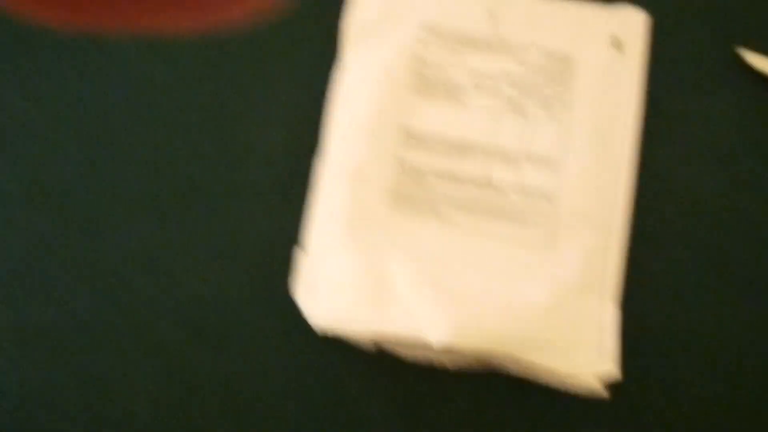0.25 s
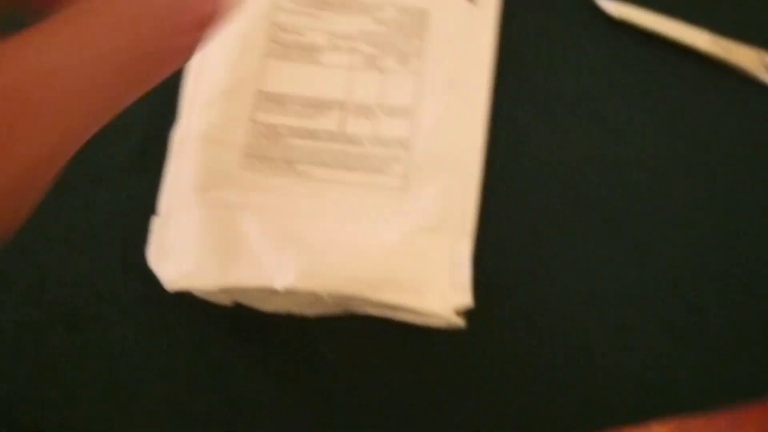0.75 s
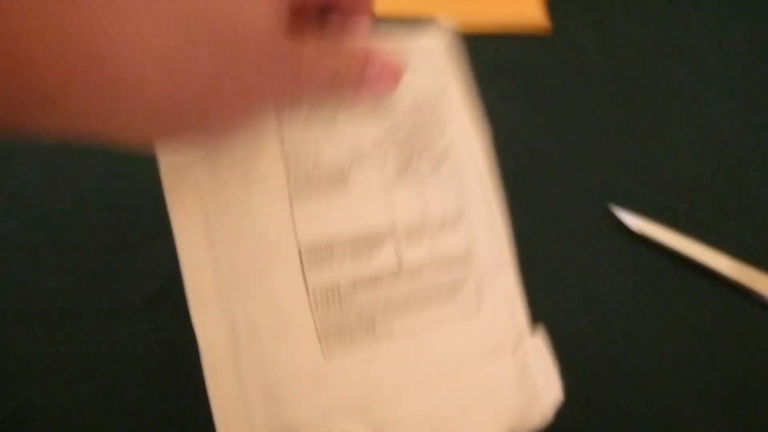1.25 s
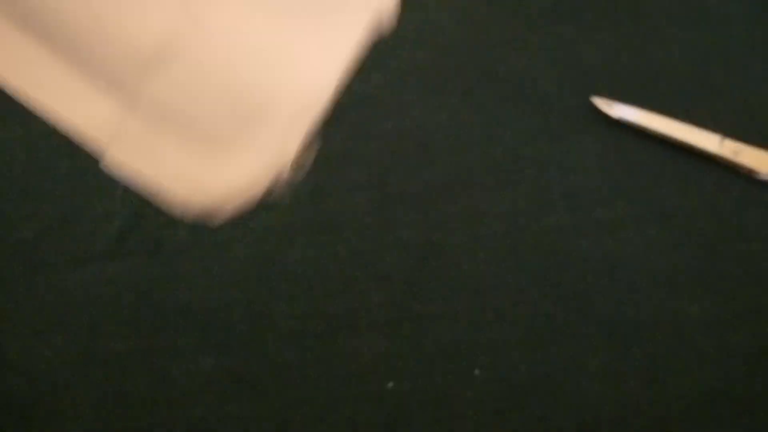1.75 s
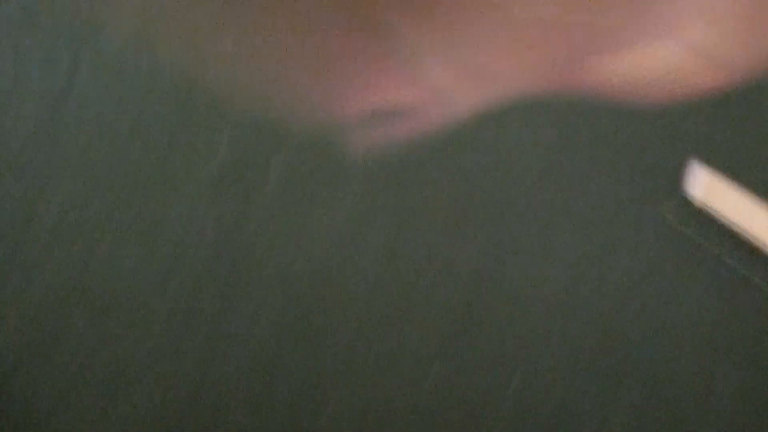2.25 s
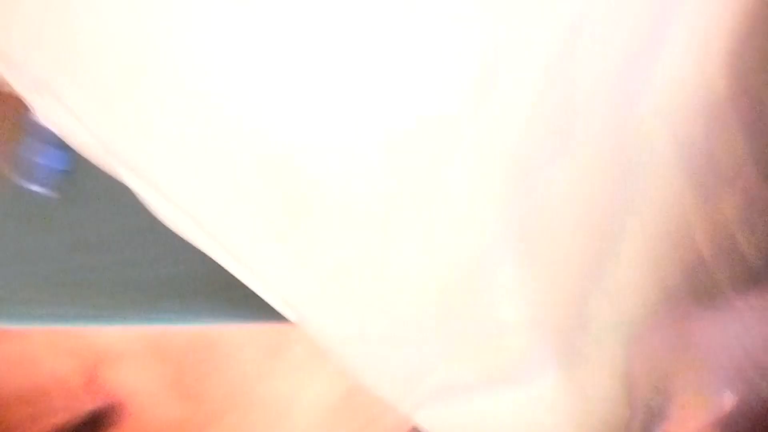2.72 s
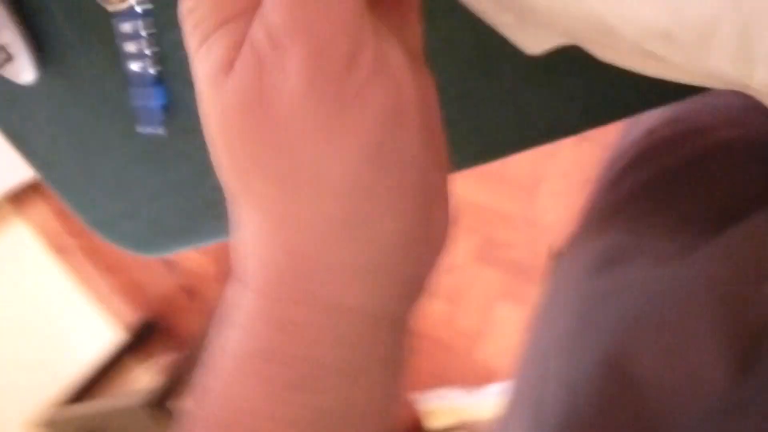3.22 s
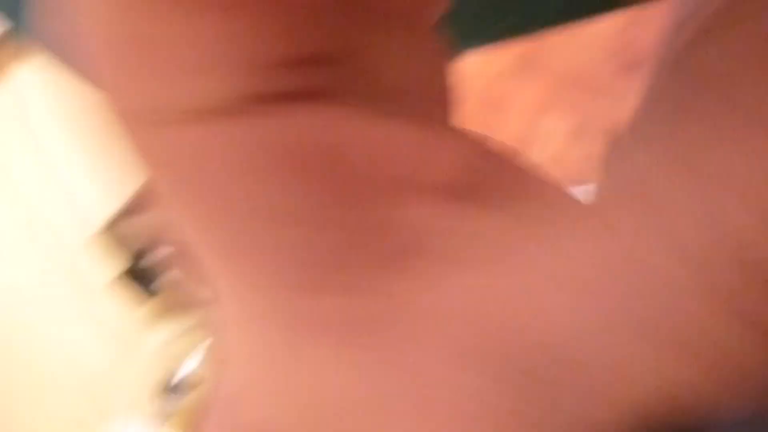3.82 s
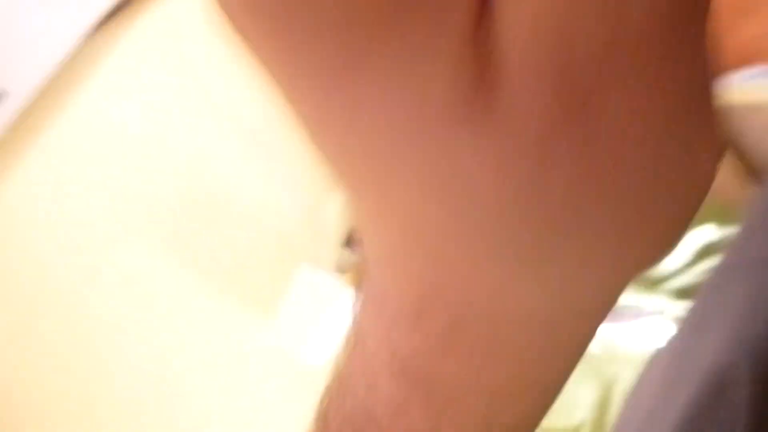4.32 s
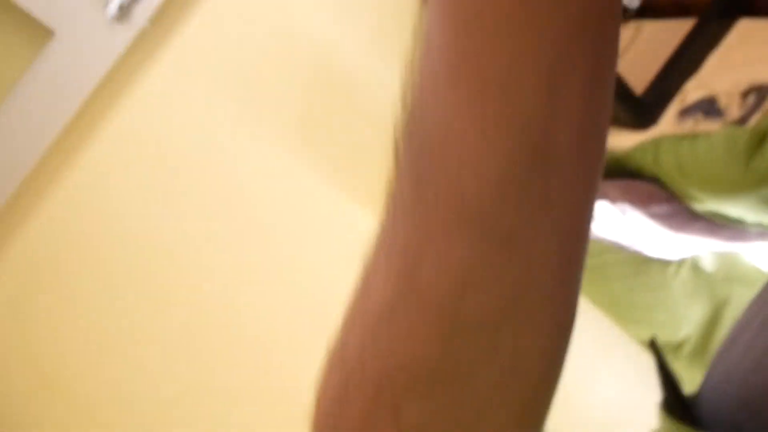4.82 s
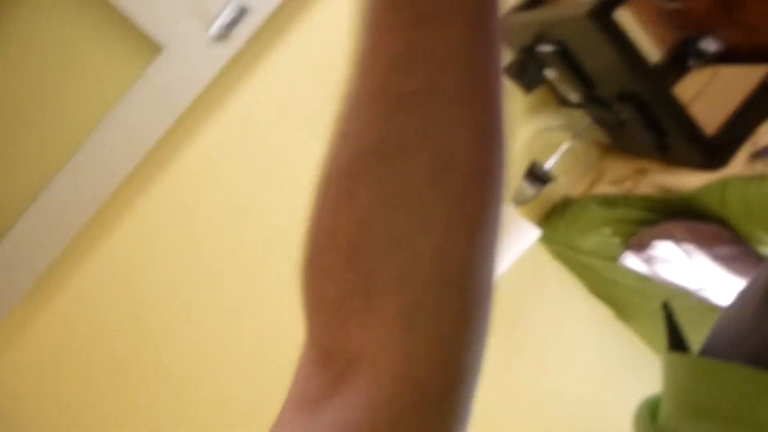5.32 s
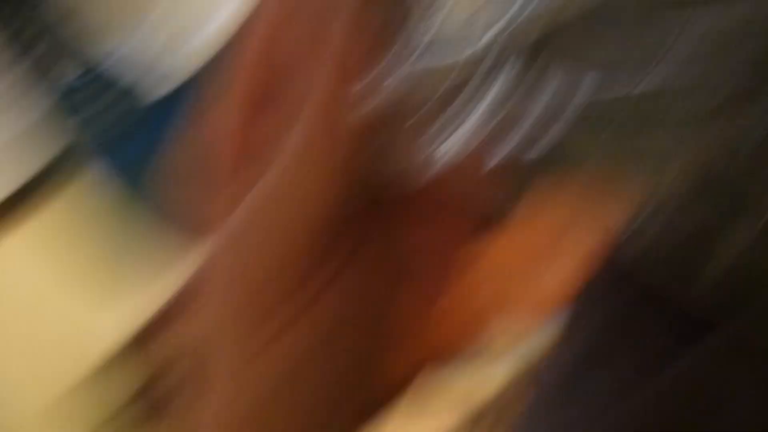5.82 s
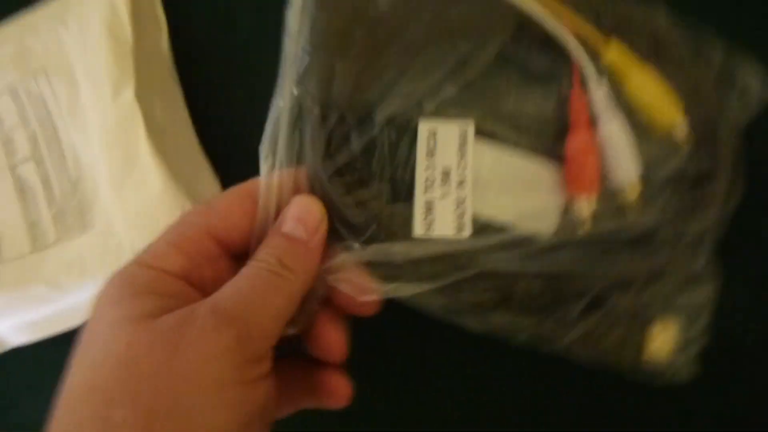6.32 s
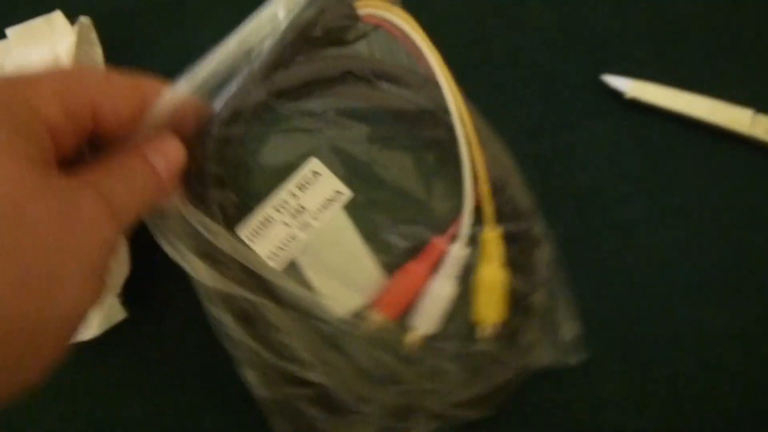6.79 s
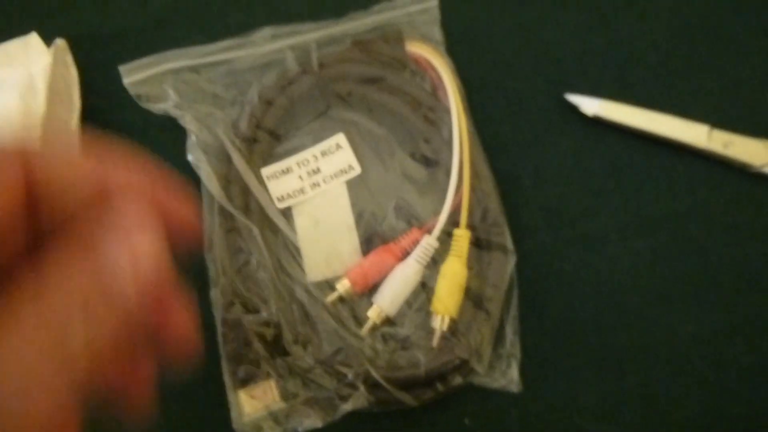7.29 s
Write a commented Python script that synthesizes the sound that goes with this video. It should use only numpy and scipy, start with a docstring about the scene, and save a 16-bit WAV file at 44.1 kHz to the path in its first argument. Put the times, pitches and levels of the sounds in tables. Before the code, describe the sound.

Handling of stiff paper on a cloth-covered table: a light slide, small crackles, two dull bumps, then coarse crumpling and ripping that comes and goes, with dense crackle, hard snaps and airy flaps. Afterwards, a lighter, crisper plastic bag crinkles in short strokes, with a thud and a final knock. Close stereo microphone, short dry room reflections, faint steady hiss underneath.

```python
"""Envelope and plastic bag at a table

A paper envelope is slid over a cloth, flexed and torn close to two microphone ports, then a plastic bag crinkles.
Paper and bag are showers of tiny noise cracks and short swings; louder creases snap with a crack and a ringing patch.
The sheet flaps as a low swing that sags in pitch, scrapes, a faint tone and low rumbles are noise through one gliding
resonance, and dull knocks ring the table's modes. A small room adds sparse reflections, over a faint background.
"""
import sys
import numpy as np
from scipy import signal
from scipy.fft import rfft, irfft
from scipy.io import wavfile
from scipy.ndimage import uniform_filter1d, map_coordinates

SR = 44100
rng = np.random.default_rng(int(sys.argv[2]) if len(sys.argv) > 2 else 0)


def master(y):
    """Save y as 16-bit WAV."""
    cut = np.clip(np.atleast_2d(y).T, -1, 1)
    pcm = np.round(cut * 32767)  # scale
    wavfile.write(sys.argv[1], SR, pcm.astype(np.int16))


N = 332955
TIME = np.arange(N) / SR  # seconds

# a crease lighter than STIFF_DB loses its creak by this much per dB
STIFF_DB, CLEAN_DB_PER_DB = -23, 0.5
# change of treble along a stroke (slightly duller), and how fast its sound dies once the hands stop pulling
TREBLE_DRIFT_DB, RELEASE_DB_PER_S = -0.5, 241
QUIET_DB = -59  # level of the part of the background shared by both ports
EDGE_HZ = 16000  # upper limit of the sound

# where the hands work: (time [s], left minus right [dB])
HAND_PLACES = [(0.0, 0.5), (0.14, -3), (2.02, 2.5), (2.84, -1.5), (2.92, 1.5), (3.28, -7.5), (3.36, -4.5),
               (4.2, -6.5), (5.61, -2.5), (5.81, -5), (6.74, 1.0), (7.4, -1.5)]
# steady background: (frequency [Hz], relative level [dB per Hz])
QUIET_COLOUR = [(30, -19.5), (100, -5), (160, -6), (250, 0.5), (400, -5.5), (650, -5.5), (1100, -7),
                (2500, -16), (7000, -19.5), (16000, -27)]
# left-right difference of the background and the room: (frequency [Hz], gain [dB])
QUIET_SPREAD = [(60, -12.5), (200, 2.5), (380, 7.5), (700, 2.5), (1300, -4), (4400, -0.5), (15000, -5.5)]
# paper skimming over the cloth: (start [s], length [s], level [dB])
CLOTH_SWISH = (.158, 0.08, -41)
# hiss of the skimming paper: (frequency [Hz], relative level [dB per Hz])
SWISH_COLOUR = [(590, -61), (1000, -4), (1910, -23), (2360, -26), (2710, -16), (6550, -4.5), (7880, 2),
                (11200, -4), (16000, -18)]
# pulls, flexes and rips of the envelope, before the body and treble trims:
# (start [s], rise [s], length [s], first level [dB], last level [dB], treble against body [dB])
PAPER_STROKES = [(0.24, 0.044, 0.18, -48.5, -54, 1.5), (0.52, 0.0068, 0.024, -47.5, -53.5, 3.5),
                 (1.057, 0.0075, 0.1, -39.5, -33.5, 1), (1.165, 0.0097, 0.12, -39.5, -42, 2),
                 (1.272, 0.0085, 0.21, -34, -41.5, 1.5), (1.52, 0.042, 0.16, -37.5, -27, -0.5),
                 (1.73, 0.013, 0.12, -32, -41, -2.5), (1.89, 0.015, 0.092, -49.5, -39.5, -2),
                 (2.294, 0.0062, 0.038, -30, -34.5, 1.5), (2.34, 0.017, .11, -39.5, -37.5, 11.5),
                 (2.47, 0.0089, 0.075, -51, -43, 2), (2.6, 0.011, 0.24, -60, -55.5, 1),
                 (2.81, .02, 0.16, -44.5, -50, -2), (2.94, 0.031, 0.22, -46, -34.5, -2),
                 (3.195, 0.0063, 0.3, -34, -42.5, 5.5), (3.48, 0.034, 0.088, -28, -34, 2.5),
                 (3.632, 0.01, 0.11, -27, -37.5, -3), (3.815, 0.01, 0.32, -32, -47.5, 2.5),
                 (4.1, 0.054, 0.18, -27, -30, 3.5), (4.35, 0.0056, 0.052, -33, -30, 3.5),
                 (4.44, 0.022, 0.067, -41, -38.5, 6.5), (4.53, .01, 0.19, -54.5, -52, 5),
                 (4.66, .015, 0.087, -42, -42, 5.5), (4.79, 0.019, 0.024, -28.5, -31, 5),
                 (4.85, 0.011, 0.029, -39, -37, 0.5), (5.002, 0.0031, 0.14, -44.5, -31.5, -0.5),
                 (5.15, 0.051, 0.23, -22, -34.5, 5), (5.41, 0.0095, 0.057, -41.5, -51, 1),
                 (5.52, 0.0062, 0.2, -40, -53.5, -10)]
# the plastic bag pulled out, turned and laid down, before the trims:
# (start [s], rise [s], length [s], first level [dB], last level [dB], treble against body [dB])
BAG_STROKES = [(5.778, 0.027, 0.14, -31.5, -36, 6.5), (5.96, 0.0079, 0.079, -57, -44, 3.5),
               (6.08, 0.019, 0.11, -53, -46.5, 4), (6.27, 0.022, 0.084, -55, -45, 0.5),
               (6.372, 0.0092, 0.029, -26, -37.5, 0), (6.43, .01, 0.21, -47.5, -48.5, 2.5),
               (6.62, 0.0093, 0.34, -54.5, -63.5, 4), (6.94, 0.031, .16, -49.5, -40.5, 3.5),
               (7.1, .008, 0.11, -42.5, -61.5, -1)]
# rustle of the paper: (frequency [Hz], relative level [dB per Hz])
PAPER_COLOUR = [(40, -28.5), (90, -7), (160, 0), (300, -2), (600, -4), (1100, 0.5), (1800, 0.5),
                (2600, 0.5), (3300, -2.5), (4100, 1), (4450, -2.5), (5000, -1), (10000, -9.5), (16000, -15)]
# rustle of the bag: (frequency [Hz], relative level [dB per Hz])
BAG_COLOUR = [(40, -46), (100, -5.5), (200, -1.5), (500, -9), (1000, -1), (1600, 0), (3000, 1.5), (4100, 7),
              (6000, 5.5), (10000, -5.5), (16000, -12)]
# sharp crack of a crease: (frequency [Hz], relative level [dB per Hz])
CRACK_COLOUR = [(300, -12), (1500, -9.5), (4100, 0), (7000, -2), (10000, -4.5), (16000, -18.5)]
# the whole sheet flapping: (time [s], level [dB], starting pitch [Hz], left minus right [dB])
SHEET_FLAPS = [(0.292, -25, 234, -14), (0.533, -38, 190, 15), (0.566, -32.5, 250, -7),
               (1.276, -46, 420, 15), (1.646, -26, 190, 1), (1.978, -31, 190, 0), (2.303, -29, 180, -3),
               (2.457, -13.5, 390, 30), (2.571, -35.5, 110, -5), (3.31, -31, 297, 16),
               (4.236, -8.5, 380, -16), (4.392, -19, 417, -2), (4.496, -19.5, 216, -10.5),
               (4.82, -31.5, 190, -3), (5.917, -51.5, 350, -12), (6.022, -35, 400, -10),
               (6.215, -42.5, 150, -4)]
# narrow resonant sounds: scrapes, a faint tone, low rumbles under rips and after knocks:
# (start [s], length [s], level [dB], first pitch [Hz], last pitch [Hz], width [Hz])
NARROW_SOUNDS = [(0.303, 0.054, -37.5, 1250, 1330, 240), (2.13, 0.29, -68, 2730, 2740, 70),
                 (2.457, 0.12, -49.5, 940, 259.6, 273), (2.935, 0.18, -40, 2480, 1970, 903),
                 (4.808, 0.1, -41, 198, 173.5, 129.2), (5.17, 0.29, -47.5, 132.1, 134, 120),
                 (6.203, 0.21, -46.5, 730, 1335, 396), (6.385, .09, -41, 210, 200, 109),
                 (7.101, 0.39, -63, 280, 199, 157.8)]
# the loud creases buckling: (time [s], level [dB], pitch of the patch [Hz], share of sharp crack [dB])
LOUD_CREASES = [(0.3179, -38, 4770, -3), (0.5661, -39, 6200, 6), (1.1675, -26, 2000, -9),
                (1.276, -24.5, 1190, -27), (1.3338, -25, 1500, -11.5), (1.3495, -24, 1670, -8),
                (1.4091, -24, 1860, -13), (1.438, -25, 1775, -12.5), (1.5525, -17.5, 1570, -17),
                (1.6185, -27, 2850, -4.5), (1.6374, -23, 1055, -5), (1.6746, -22.5, 1080, -12.5),
                (1.6828, -19, 1740, -6), (1.6901, -20, 2500, 0.5), (1.7603, -24.5, 1420, -3.5),
                (1.8902, -37, 890, -28), (1.9725, -34.5, 1285, -12.5), (2.0773, -52, 2200, -9),
                (2.3005, -25.5, 4140, -5), (2.3476, -30, 1520, -4.5), (2.6111, -36.5, 4000, -9.5),
                (2.696, -41, 4476, 2), (2.814, -44, 4000, -7), (3.094, -31.5, 4400, 3),
                (3.1529, -36.5, 4180, 0), (3.1948, -24, 3970, 3), (3.1997, -40.5, 4540, 1),
                (3.2695, -13.5, 3960, -11), (3.3093, -22, 2523, -14.5), (3.5013, -23.5, 4244, -3.5),
                (3.8534, -25.5, 1200, -6.5), (3.921, -26, 1410, -3), (3.9549, -28.5, 2613, -9),
                (4.111, -20.5, 1730, -7.5), (4.237, -21, 1916, -4.5), (4.2549, -22.5, 4050, -7),
                (4.3336, -25.5, 890, -4.5), (4.392, -25.5, 862, -15.5), (4.399, -24.5, 1510, -2),
                (4.457, -20, 1063, -1), (4.4975, -17.5, 4090, -3), (4.5903, -36.5, 2530, -22),
                (4.671, -31.5, 1235, -4), (4.736, -31.5, 6200, -7), (4.82, -23, 5050, 9),
                (5.0792, -21, 1796, -20), (5.083, -16.5, 4200, -15.5), (5.1354, -22.5, 1660, -3.5),
                (5.2055, -25, 1670, -9.5), (5.3856, -26.5, 8000, 1), (5.526, -31.5, 1263, -3.5),
                (5.6105, -29.5, 1513, -22), (5.698, -45.5, 4900, -27), (5.9179, -25.5, 940, -3.5),
                (5.99, -31.5, 5760, -9), (6.022, -28.5, 680, 2), (6.161, -37, 2970, 7),
                (6.2492, -41, 4720, -6), (6.3447, -33.5, 6820, -13), (6.43, -34, 4550, 5),
                (6.517, -36.5, 4470, 0), (6.558, -37.5, 4830, -2), (6.5978, -33.5, 7200, -7),
                (6.7443, -39.5, 2084, -14), (6.8036, -39, 4020, -10), (6.909, -41, 2183, -8),
                (6.953, -40.5, 5070, -36), (6.9883, -37, 4870, -9), (7.0913, -30, 1060, -3)]
# knocks on the table: (time [s], level [dB], contact time [s])
TABLE_KNOCKS = [(1.065, -19, 0.005), (1.098, -27, 0.0028), (1.172, -19.5, 0.0014), (1.199, -27, 0.005),
                (6.379, -16.5, 0.003), (6.411, -34, 0.0029), (7.09, -10.5, 0.00075), (7.131, -29, .0014),
                (7.152, -27, 0.0016)]
# the table's modes, each knock shifting the pitch a little:
# (nominal frequency [Hz], relative level [dB], time to fall 60 dB [s])
TABLE_MODES = [(100, -7.5, 0.11), (145.6, -13.5, 0.33), (190, -1, 0.15), (235, -4, 0.18),
               (263, -1.5, 0.068), (313.4, -5, 0.29), (380, -13, 0.17), (551, 1, 0.067), (801, -30.5, 0.18)]
# the part that differs at random between the ports: (frequency [Hz], gain [dB])
PORT_SPREAD = [(60, -6.5), (380, -8.5), (1300, -12), (5000, -16.5), (15000, -4.5)]
# the part by which the left port leads the right by a quarter cycle: (frequency [Hz], gain [dB])
PORT_LEAD = [(60, -26.5), (320, 4), (700, -2.5), (1300, -16), (3000, -25)]
# how long the room rings: (frequency [Hz], time to fall 60 dB [s])
ROOM_DECAY = [(150, 0.18), (1000, 0.42), (4000, 0.11), (14000, 0.18)]


def gain_of(db):
    """Decibels to amplitude."""
    return 10 ** (np.asarray(db) / 20)


def evened(x):
    """Scales to rms 1."""
    return x / np.sqrt(np.mean(x ** 2) + 1e-20)


def read(points, hz):
    """Reads a table on a log-frequency axis."""
    f, value = np.transpose(points)
    return np.interp(np.log(hz + 1), np.log(f + 1), value)


def add(mix, s, sound):
    """Mixes a sound in at time s."""
    part = mix[..., max(round(s * SR), 0):][..., :sound.shape[-1]]
    part += sound[..., :part.shape[-1]]


def colour(x, points, size=2048):
    """Filters with the given spectrum without smearing backwards in time, so that attacks stay sharp."""
    log_gain = np.log(gain_of(read(points, abs(np.fft.fftfreq(size, 1 / SR)))))
    taps = np.fft.ifft(np.exp(np.conj(signal.hilbert(log_gain)))).real
    return signal.oaconvolve(x, taps)[:len(x)]


def band(x, hz, kind, order=3):
    """Low-pass, high-pass or band-pass."""
    return signal.sosfilt(signal.butter(order, hz, kind, fs=SR, output="sos"), x)


def panned(x, db):
    """Places a sound between left and right at constant power."""
    lean = gain_of(db * np.ones(len(x)))
    return np.array([lean * x, x]) * np.sqrt(2 / (1 + lean ** 2))


def burst(decay_s, size=512):
    """A puff of noise that dies away."""
    return rng.standard_normal(size) * np.exp(-np.arange(size) / SR / decay_s)


def wander(hz):
    """Smooth random motion of rms 1 that changes hz times a second."""
    knots = rng.standard_normal(N)
    return evened(np.interp(TIME * min(hz, 1000), np.arange(N), knots))


def quiet():
    """Steady background of the room and the microphone's hiss: noise, partly different left and right."""
    mid, side = (evened(colour(rng.standard_normal(N), QUIET_COLOUR)) for _ in range(2))
    side = colour(side, QUIET_SPREAD)
    return gain_of(QUIET_DB) * np.array([mid + side, mid - side])


def swish():
    """The envelope skims over the cloth with a thin hiss."""
    s, length, db = CLOTH_SWISH
    out, size = np.zeros(N), int(length * SR)
    hiss = evened(colour(rng.standard_normal(size), SWISH_COLOUR))
    add(out, s, gain_of(db) * hiss * signal.windows.tukey(size, .6))
    return out


def effort(strokes):
    """Level and brightness over time: each stroke rises, swells or slackens steadily, and is released."""
    power, treble, t = np.full(N, 1e-12), np.zeros(N), TIME[:SR]
    for start, rise_s, length, first_db, last_db, treble_db in strokes:
        along = np.minimum(t / length, 1)
        held_db = first_db + along * (last_db - first_db)
        held_db = held_db - RELEASE_DB_PER_S * np.maximum(t - length, 0)
        stroke = (gain_of(held_db) * np.minimum(t / rise_s, 1)) ** 2
        add(power, start, stroke)
        add(treble, start, stroke * (treble_db + TREBLE_DRIFT_DB * (along - .5)))
    # where strokes overlap, the louder one weighs more in the brightness
    return 10 * np.log10(power), treble / power


def patch(hz, cycles, overtone_db, size=512):
    """A buckled patch of sheet swings for a few cycles, with a lower and a higher neighbour mode."""
    t = np.arange(size) / SR
    modes = hz * np.array([1, rng.uniform(0.5, 0.837), 1.7])[:, None]
    swings = np.sin(2 * np.pi * modes * t) * np.exp(-t * np.sqrt(modes * hz) / cycles)
    return swings[0] + gain_of(overtone_db) * (rng.choice([-1, 1], 2) @ swings[1:])


def steadied(x, size=2200):
    """Holds the running rms near 1 and keeps the fine grain."""
    power = uniform_filter1d(uniform_filter1d(x ** 2, size), size // 2)
    return x / np.sqrt(abs(power) + 1e-4 * np.mean(x ** 2))


def bending(x, depth_db, size=256):
    """As the sheet bends its resonances come and go: drifting hills in the spectrum, narrower low down."""
    hz, t, z = signal.stft(x, SR, nperseg=size)
    hills = rng.standard_normal((40, 400))
    where = np.meshgrid(2.557 * np.log2(1 + hz / 300), t / 0.034, indexing="ij")
    hills_db = depth_db * map_coordinates(hills, where, order=1, mode="mirror")
    return signal.istft(z * gain_of(hills_db), SR, nperseg=size)[1][:N]


def rustle(strokes, spectrum, per_s, spread_db, hiss_db, crack_s, swing_db, bend_db,
           body_db, treble_db, air, count=8):
    """Fibres and small creases crack, faster as the hands pull harder, over a hiss of rubbing."""
    level_db, bright_db = effort(strokes)
    # per_s is the crack rate at a level of -38 dB
    rate = np.maximum(per_s * gain_of(1.1 * (level_db + 38.0)), 200)
    happens = rng.random(N) < rate / SR
    sizes = gain_of(spread_db * np.minimum(rng.exponential(1, N), 3)) * happens
    power = signal.lfilter([1], [1, -np.exp(-2 / (crack_s * SR))], sizes ** 2 + 1e-12)
    cracks = np.sqrt(power) * rng.standard_normal(N)
    # about a third of the cracks set a small patch swinging
    kind, swings = rng.integers(0, 3 * count, N), np.zeros(N)
    for k, hz in enumerate(np.geomspace(650, 2600, count)):
        swing = patch(hz, cycles=2.7, overtone_db=1.0)
        swings += signal.oaconvolve(sizes * (kind == k), swing)[:N]
    grain = steadied(evened(cracks) + gain_of(swing_db) * evened(swings))
    grain = grain + gain_of(hiss_db) * rng.standard_normal(N)
    sheet = bending(colour(grain, spectrum), bend_db)
    body, treble = band(sheet, 2500, "low"), band(sheet, 2500, "high")
    # a taut sheet cracks more sharply, which lifts the very top most
    top = signal.filtfilt(*signal.butter(2, 7000, "high", fs=SR), treble)
    treble = treble - top + top * gain_of(air * (bright_db + 1.0))
    body = gain_of(body_db) * steadied(body)
    treble = gain_of(bright_db + treble_db) * steadied(treble)
    return gain_of(level_db) * (body + treble)


def small_snaps(strokes, per_s, over_db, spread_db, taut, low_hz, high_hz, share_db):
    """Lists lesser creases at uneven moments of each stroke: louder with the pull, weaker if taut and bright."""
    rows = []
    for start, rise_s, length, first_db, last_db, treble_db in strokes:
        count = int(round(length * per_s))
        for k, (when, size, pitch) in enumerate(rng.random((40, 3))[:count]):
            along = (k + when) / count
            db = first_db + along * (last_db - first_db) + over_db
            db += spread_db * (size - .5) - taut * max(treble_db, 0)
            db += 20 * np.log10(min(along * length / rise_s, 1))  # softer while the stroke rises
            hz = low_hz * (high_hz / low_hz) ** pitch
            rows.append((start + along * length, db, hz, share_db))
    return rows


def snaps(creases, crack_s, rise_s, cycles, overtone_db, yield_db, rebound_db, low_cut):
    """Each crease creaks, then gives way with a sharp crack and a short swing; the sheet rebounds just after."""
    out = np.zeros(N)
    for s, db, hz, share_db in creases:
        share = np.clip(gain_of(share_db), 0, .95)
        crack = evened(colour(burst(crack_s), CRACK_COLOUR))
        swing = evened(patch(hz, cycles, overtone_db))
        snap = share * crack + np.sqrt(1 - share ** 2) * swing
        snap = evened(snap * (1 - np.exp(-TIME[:len(snap)] / rise_s)))
        rebound = evened(patch(hz, cycles, overtone_db) + 0.067 * burst(0.0015))
        add(snap, rng.uniform(.001, .003), gain_of(rebound_db) * rebound)
        # a small patch radiates little below its own pitch
        snap = band(np.pad(snap, (0, 512)), min(low_cut * hz, 1500), "high", order=2)
        add(out, s, gain_of(db) * evened(snap))
        # stiff, loud creases creak just before they give; light ones snap cleaner
        creak_db = db + yield_db - CLEAN_DB_PER_DB * max(STIFF_DB - db, 0)
        creak = evened(colour(burst(.002), CRACK_COLOUR))
        add(out, s - rng.uniform(.002, 0.0045), gain_of(creak_db) * creak)
    return out


def flaps(cycles, sag, skew, puff_db, puff_s):
    """The sheet pushes air in a damped swing whose pitch sags, with a puff; the ports catch it out of step."""
    out, t = np.zeros((2, N)), np.arange(SR // 10) / SR
    for s, db, hz, side_db in SHEET_FLAPS:
        turns = np.log1p(abs(sag) * hz * t) / abs(sag)  # cycles swung so far
        push = gain_of(db) * np.exp(-turns / cycles) * (1 - np.exp(-turns / 0.042))
        puff = band(burst(puff_s, size=len(t)), [hz, 3 * hz], "band", order=2)
        swing = push * np.sin(2 * np.pi * turns) + gain_of(db + puff_db) * puff / abs(puff).max()
        across = skew * hz / 400 * push * np.sin(2 * np.pi * turns + .8) * np.sign(side_db)
        flap = panned(swing, side_db) + np.array([across, -across])
        add(out, s, band(flap, 0.14 * hz, "high", order=2))
    return out


def narrow_sounds(rough):
    """Scrapes, a faint tone and low rumbles: uneven noise through one resonance that glides."""
    out = np.zeros(N)
    for s, length, db, first_hz, last_hz, width_hz in NARROW_SOUNDS:
        size = int(length * SR)
        drive = rng.standard_normal(SR)[:size] * np.exp(rough * wander(hz=120)[:size])
        turn = np.exp(2j * np.pi * np.cumsum(np.linspace(first_hz, last_hz, size)) / SR)
        # shift the gliding pitch down to zero, keep a narrow band, shift it back
        ring = (turn * band(drive / turn, width_hz / 2, "low", order=2)).real
        add(out, s, gain_of(db) * evened(ring) * signal.windows.tukey(size, .6))
    return out


def knocks(ring_db, thud_db, thud_s):
    """A blow thuds and rings the table; a longer contact is duller."""
    out, t = np.zeros(N), np.arange(SR // 2) / SR
    for s, db, contact_s in TABLE_KNOCKS:
        ring = np.zeros(len(t))
        for hz, mode_db, t60 in TABLE_MODES:
            angle = 2 * np.pi * hz * rng.uniform(0.81, 1.03) * t + rng.uniform(0, 2 * np.pi)
            ring += gain_of(mode_db - 60 * t / t60) * np.sin(angle)
        thud = band(burst(thud_s, size=len(t)), 138, "high", order=2)
        dull_hz = np.clip(0.7 / contact_s, 60, 5000)
        ring, thud = (band(x, dull_hz, "low", order=2) for x in (ring, thud))
        ring = gain_of(ring_db) * ring / abs(ring).max()
        thud = gain_of(thud_db) * thud / abs(thud).max()
        add(out, s, gain_of(db) * (ring + thud))
    return out


def ports(x):
    """Half the difference between the two ports: a steady lead, and a part that changes from crack to crack."""
    analytic = signal.hilbert(x)
    scattered = (analytic * (wander(hz=150) + 1j * wander(hz=150))).real / np.sqrt(2)
    lead_gain = gain_of(read(PORT_LEAD, np.fft.rfftfreq(N, 1 / SR)))
    lead = irfft(rfft(-analytic.imag) * lead_gain, N)
    return lead + colour(scattered, PORT_SPREAD)


def room(x):
    """Sparse reflections from desk and walls, each band dying at its own speed."""
    size = SR // 2
    arrives = (rng.random(size) < 2500 / SR) * (TIME[:size] > .004)
    taps = rng.choice([-1., 1.], size) * arrives
    hz, t, z = signal.stft(taps, SR, nperseg=256)
    fade = gain_of(-60 * t / read(ROOM_DECAY, hz)[:, None])
    tail = signal.istft(z * fade, SR, nperseg=256)[1]
    return signal.oaconvolve(x, tail / np.linalg.norm(tail))[:N]


def scene():
    """All sources in the room; all but the flaps and knocks are placed by the hands' position."""
    paper = rustle(PAPER_STROKES, PAPER_COLOUR, per_s=580, spread_db=4.5, hiss_db=-2.5, crack_s=0.00055,
                   swing_db=-8, bend_db=4.0, body_db=0.5, treble_db=0.0, air=0.8)
    bag = rustle(BAG_STROKES, BAG_COLOUR, per_s=800, spread_db=5.5, hiss_db=-6.5, crack_s=0.00067,
                 swing_db=-4.5, bend_db=5.5, body_db=3, treble_db=2, air=0.9)
    folds = small_snaps(PAPER_STROKES, per_s=20, over_db=-1, spread_db=13, taut=.2,
                        low_hz=1200, high_hz=7500, share_db=-10)
    crinkles = small_snaps(BAG_STROKES, per_s=16, over_db=-0.5, spread_db=6, taut=.2,
                           low_hz=2000, high_hz=7050, share_db=-7)
    ticks = snaps(folds + crinkles, crack_s=0.00086, rise_s=.0001, cycles=1.9, overtone_db=-4,
                  yield_db=-34, rebound_db=-18.5, low_cut=0.35)
    pops = snaps(LOUD_CREASES, crack_s=0.0012, rise_s=0.00018, cycles=1.4, overtone_db=-8.5,
                 yield_db=-10.5, rebound_db=-6.5, low_cut=0.2)
    near = swish() + paper + bag + ticks + pops + narrow_sounds(rough=0.35)
    side = ports(near)
    flapping = flaps(cycles=1.0, sag=0.17, skew=0.78, puff_db=1.5, puff_s=0.0041)
    knocking = knocks(ring_db=-6, thud_db=-2, thud_s=0.01)
    placed = panned(near, np.interp(TIME, *np.transpose(HAND_PLACES)))
    direct = placed + np.array([side, -side]) + flapping + knocking
    middle = direct.mean(0)
    wet, wet_side = room(middle), colour(room(middle), QUIET_SPREAD)
    reflections = gain_of(-20.0) * np.array([wet + wet_side, wet - wet_side])
    return direct + reflections + quiet()


def record(dry):
    """The small microphone loses the deep bass and clips at full scale; then the treble is cut off."""
    overloaded = np.clip(band(dry, 87, "high", order=2), -1, 1)
    taps = signal.firwin(511, EDGE_HZ, window=("kaiser", 9), fs=SR)
    return signal.oaconvolve(overloaded, taps[None], "same")


dry = scene()
out = record(dry)
master(out)
```